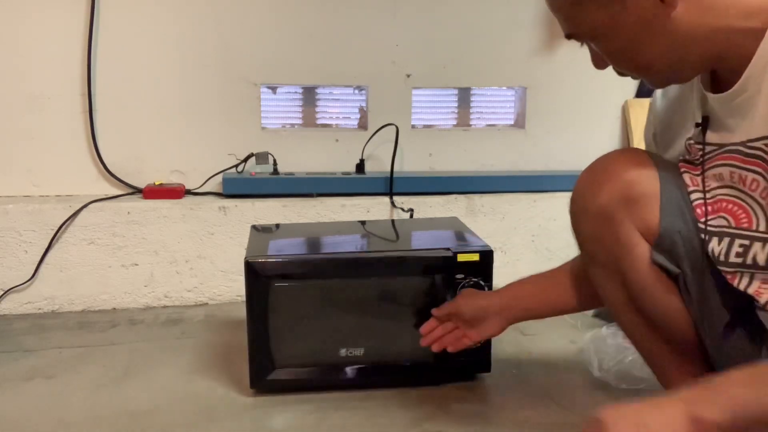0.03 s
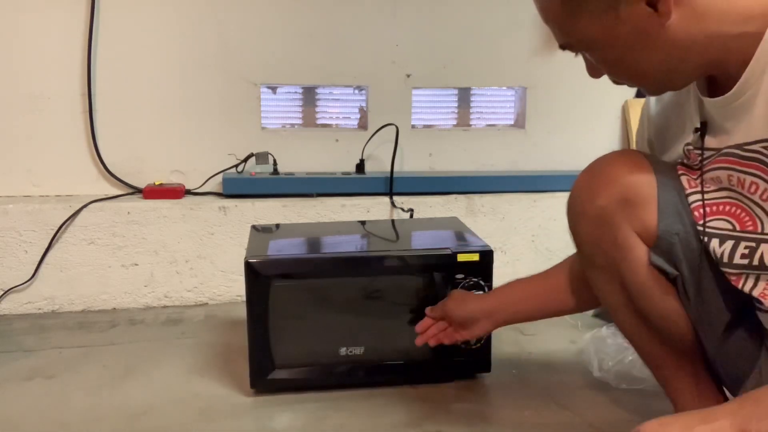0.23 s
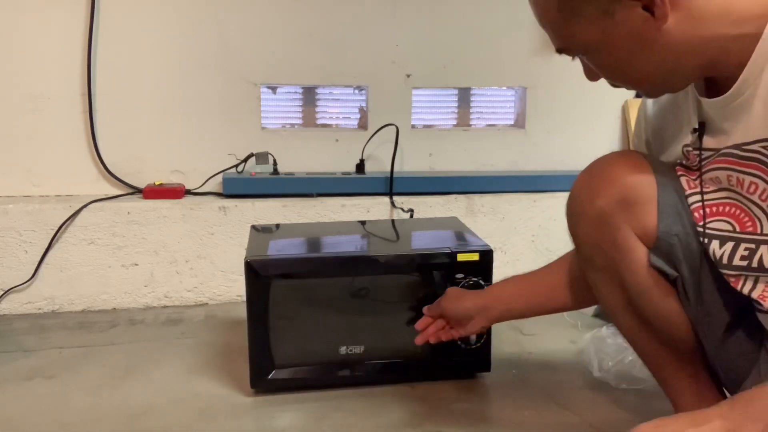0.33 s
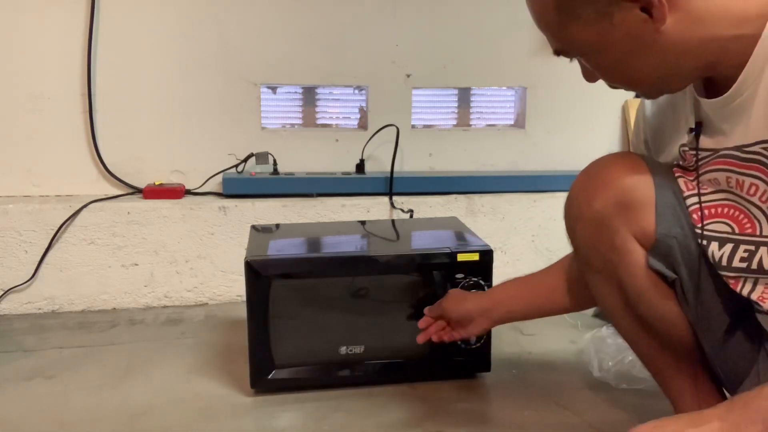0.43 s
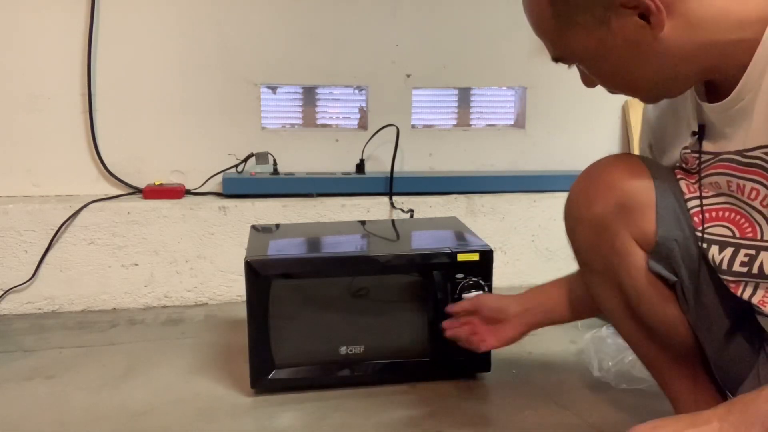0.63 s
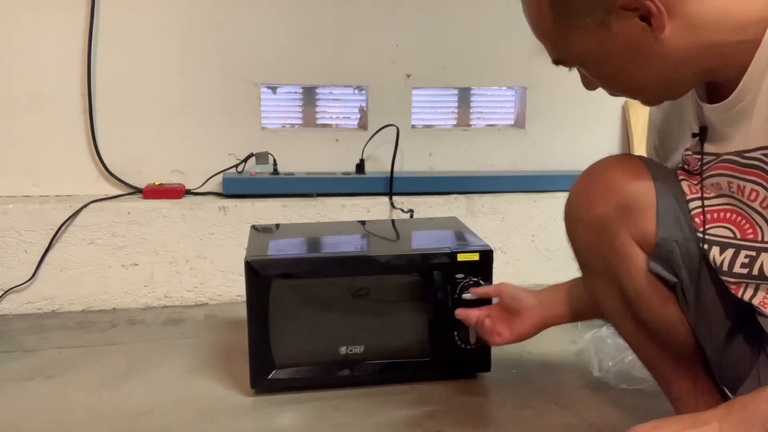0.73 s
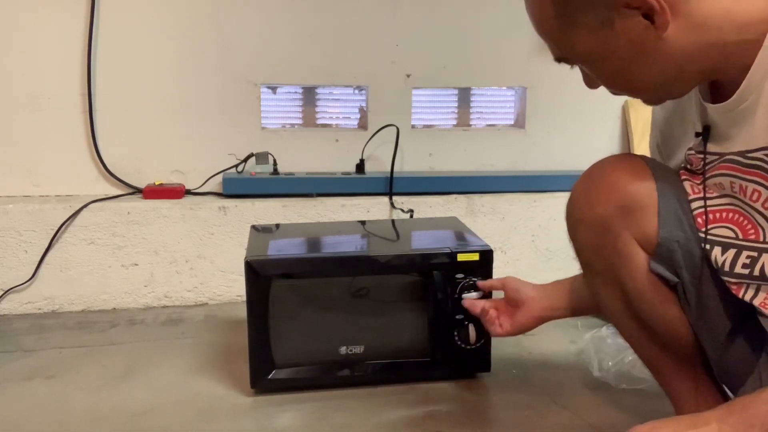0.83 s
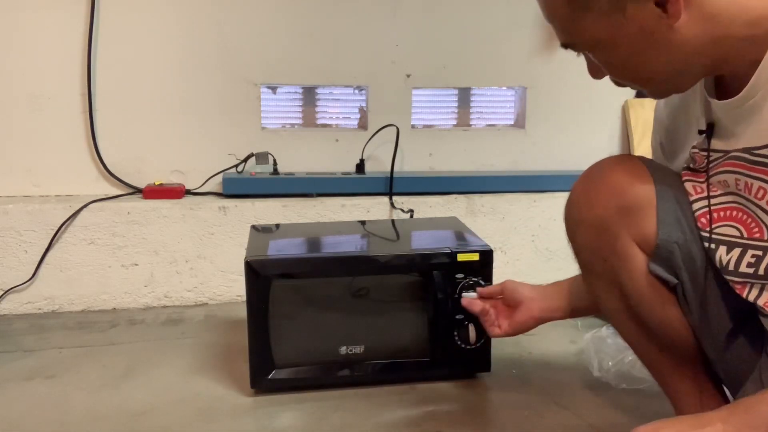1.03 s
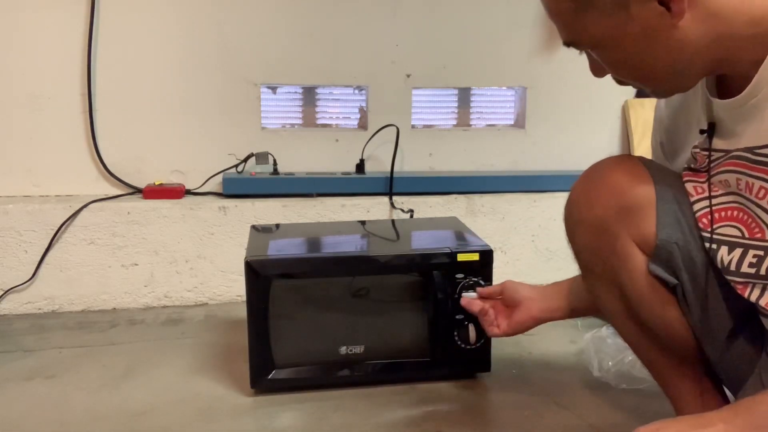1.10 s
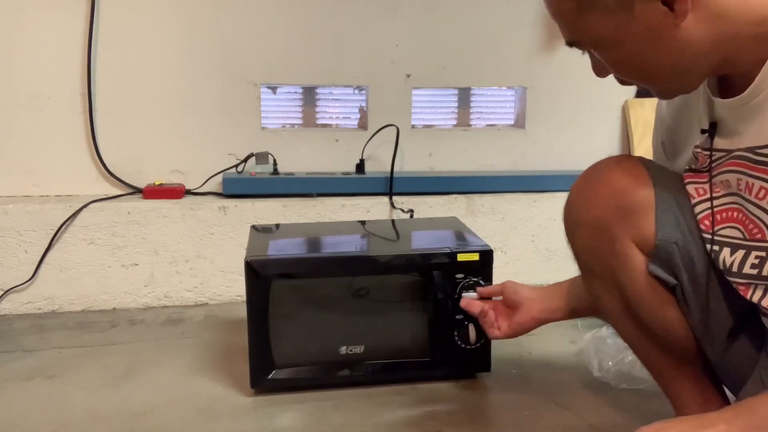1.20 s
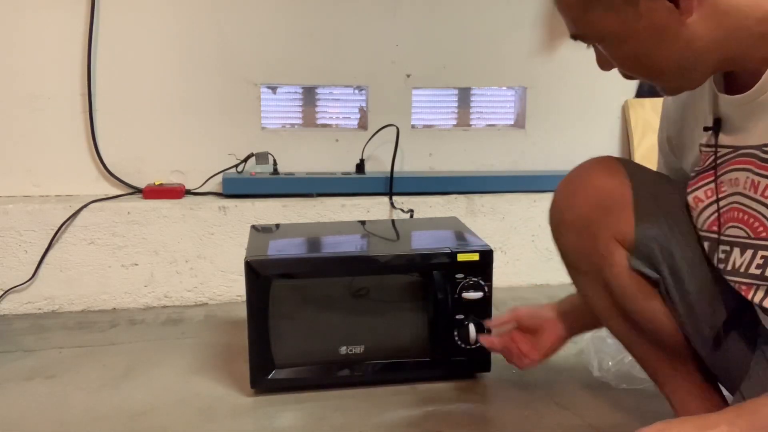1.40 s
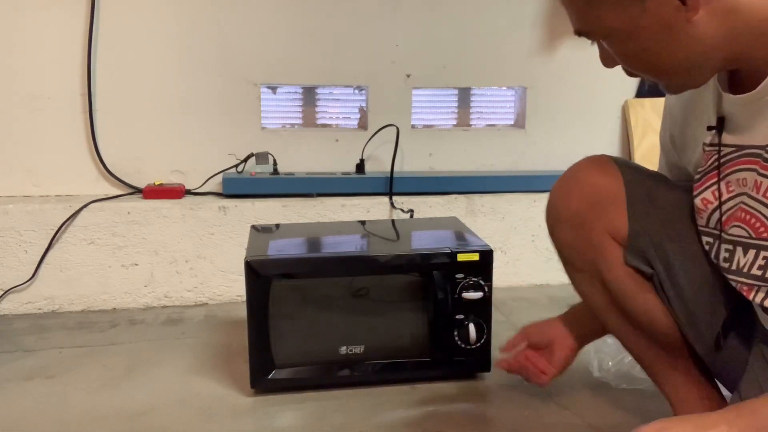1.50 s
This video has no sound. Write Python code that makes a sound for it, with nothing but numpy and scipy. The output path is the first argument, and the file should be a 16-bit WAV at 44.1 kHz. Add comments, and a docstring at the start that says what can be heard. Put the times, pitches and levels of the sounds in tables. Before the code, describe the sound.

The loud slam of a microwave door overloads a close microphone in a quiet room. As the metal case rings away, a plastic knob is softly knocked and turned, giving a dull rub and a few small, sharp ticks.

```python
"""A quiet, hard-walled room: the door of a small microwave oven is slammed, overloading a close mic.
An earlier bump is dying away at the start. Air puffs ahead of the door, the latch brushes its catch,
the door hits and rebounds, and the steel case booms and hums on for a second. Afterwards a hand
knocks on the plastic timer knob and turns it, with a dull rub and a few sharp ticks."""
import sys
import numpy as np
from scipy import signal
from scipy.fft import rfft, irfft
from scipy.io import wavfile
from scipy.ndimage import uniform_filter1d

SR = 44100
rng = np.random.default_rng(int(sys.argv[2]) if len(sys.argv) > 2 else 0)


def log_audio(samples):
    """Write samples as a 16-bit WAV file to the path given in sys.argv[1]."""
    # one column per channel
    frames = np.atleast_2d(samples).T
    # limit to full scale, then quantise
    limited = np.clip(frames, -1, 1)
    pcm = np.round(limited * 32767).astype(np.int16)
    wavfile.write(sys.argv[1], SR, pcm)


N = 68355
T = np.arange(N) / SR
HZ = np.fft.rfftfreq(N, 1 / SR)
SLAM_S = 0.2432

# what a blow on the door radiates at once (frequency [Hz], relative level [dB])
CRACK_SPECTRUM = [(30, -18.5), (55, -18), (100, -5), (220, -3.5), (340, 3.5), (480, -5), (800, -7),
                  (1250, -5), (2000, -17.5), (4000, -20.5), (7500, -22.5), (11000, -32), (15000, -42)]
# reverb time of the room (frequency [Hz], t60 [s])
ROOM_DECAY = [(60, 0.71), (250, 0.48), (700, 0.45), (1500, 0.38), (4000, 0.43), (8000, 0.37), (15000, .28)]


def amp(db):
    """Decibels to gain."""
    return 10 ** (np.asarray(db) / 20)


def unit_rms(x):
    """Scales to an rms of one."""
    return x / np.sqrt(np.mean(x ** 2) + 1e-20)


def curve_at(points, hz):
    """Reads a breakpoint curve on a log-frequency axis."""
    freqs, values = np.transpose(points)
    return np.interp(np.log(hz + 1), np.log(freqs + 1), values)


def fade(t, t60):
    """Exponential decay, 60 dB down after t60 seconds."""
    return np.exp(-np.log(1000) * t / t60)


def add(mix, start_s, sound):
    """Drops a sound into the mix at its start time."""
    part = mix[round(start_s * SR):][:len(sound)]
    part += sound[:len(part)]


def noise(spectrum, tilt_db=0):
    """Unit-rms noise of a given colour, tilted by tilt_db per octave."""
    gain = amp(curve_at(spectrum, HZ) + tilt_db * np.log2(HZ + 1))
    return unit_rms(irfft(rfft(rng.standard_normal(N)) * gain, N))


def noise_tail(spectrum, decay, tilt_db=0):
    """Coloured noise in which each band dies away at its own rate."""
    hz, t, bands = signal.stft(noise(spectrum, tilt_db), SR, nperseg=512)
    bands = bands * fade(t, curve_at(decay, hz)[:, None])
    return signal.istft(bands, SR, nperseg=512)[1][:N]


def room_tone():
    """A low bed of room noise whose level wavers a little."""
    # colour of the quiet room (frequency [Hz], relative level [dB])
    air_spectrum = [(20, 0), (55, -1), (110, -9), (260, -9), (600, -15), (1000, -21), (1350, -18),
                    (2000, -30), (6500, -31), (10000, -37), (15000, -47)]
    rates_hz = np.geomspace(1, 20, 20)
    swell = sum(np.sin(2 * np.pi * (hz * T + rng.random())) / np.sqrt(hz) for hz in rates_hz)
    return amp(-48.5 + 1.35 * unit_rms(swell)) * noise(air_spectrum)


def bump():
    """The tail of an earlier bump and scuff dies away."""
    # colour of the bump (frequency [Hz], relative level [dB])
    bump_spectrum = [(40, -9.5), (200, 1.5), (400, -13), (800, -5), (1600, -19), (5000, -24.5),
                     (11500, -30.5), (14000, -44)]
    # how long its bands ring (frequency [Hz], t60 [s])
    bump_decay = [(200, 0.71), (800, 0.42), (3000, 0.73), (8000, 1.35)]
    return amp(-31) * noise_tail(bump_spectrum, bump_decay)


def air_puff():
    """Air pushed ahead of the closing door: a dull puff that peaks at the hit."""
    envelope = np.exp(-abs(SLAM_S - T) / 0.0068)
    return amp(-21.5) * noise(CRACK_SPECTRUM, tilt_db=-2.5) * envelope


def door_blows():
    """Each blow gives a short crack and a clatter that lingers in the room."""
    # first contact, the hit, the latch snapping in, the rebound (time [s], level [dB])
    blows = [(.2410, -29), (0.2431, 1), (0.248, -1), (0.257, -7)]
    # dense ringing of panels and loose parts (frequency [Hz], relative level [dB])
    clatter_spectrum = [(30, -2.5), (100, -5.5), (200, 2), (420, -1.5), (620, 2), (900, -3.5), (1300, -4),
                        (1900, -9.5), (3000, -10.5), (4300, -16), (7000, -16), (10000, -25.5), (15000, -40)]
    crack_attack = 1 - np.exp(-T / 0.00061)
    clatter_attack = 1 - np.exp(-T / 0.004)
    out = np.zeros(N)
    for start_s, db in blows:
        crack = amp(0.5) * noise(CRACK_SPECTRUM) * fade(T, t60=0.062) * crack_attack
        clatter = amp(-12) * noise_tail(clatter_spectrum, ROOM_DECAY) * clatter_attack
        add(out, start_s, amp(db) * (crack + clatter))
    return out


def door_resonances(x):
    """Many small, overlapping resonances of the door colour a sound like an uneven EQ."""
    spacing_hz, depth_db = 140, 3
    grid_hz = np.arange(0, SR / 2, spacing_hz)
    heights = rng.standard_normal(2000)[:len(grid_hz)]
    ripple_db = depth_db * np.interp(HZ, grid_hz, heights)
    gain = amp(ripple_db * np.minimum(HZ / 1000, 1))  # flatter towards the bass
    return irfft(rfft(x) * unit_rms(gain), N)


def door_thump():
    """The door's landing pushes a pulse of air through the room: a deep thump."""
    out = np.zeros(N)
    add(out, SLAM_S, amp(4.5) * np.sin(2 * np.pi * 122.5 * T) * fade(T, t60=0.047))
    return out


def case_boom():
    """The hit sets the steel panels booming; a few modes hum on. Little remains below about 45 Hz."""
    # modes of the steel case (frequency [Hz], level [dB], t60 [s])
    case_modes = [(67, -9, 0.11), (125.1, -13, 0.13), (165.6, -29.5, 2.72), (160.5, -23, 0.76),
                  (187.9, -21, 0.97), (193.6, -9, 0.3), (253, -15, .36), (249, -41, 2.8), (342, -38, 1.51),
                  (321, -8.5, .17), (349.6, -4.5, .2), (419.6, -33.5, .9), (489.3, -13, 0.28),
                  (550, -10, 0.26), (701, -25.5, 0.79), (794, -12.5, 0.15), (878, -17.5, 0.16),
                  (889.4, -18.5, 0.26), (1024, -25, .26), (1154, -7.5, 0.14), (1410, -40.5, 1.16),
                  (1467, -13.5, .23), (1550, -57.5, 0.4), (1995, -27, 0.31), (2700, -24, 0.17),
                  (2928, -14.5, 0.12), (3044, -24.5, 0.37)]
    ring = sum(amp(db) * fade(T, t60) * np.sin(2 * np.pi * hz * T) for hz, db, t60 in case_modes)
    attack = 1 - np.exp(-T / 0.0076)
    out = np.zeros(N)
    add(out, SLAM_S, ring * attack)
    return signal.sosfilt(signal.butter(2, 45, "high", fs=SR, output="sos"), out)


def knob_knocks():
    """Fingers knock softly on the plastic knob: a noisy tap, a hollow tone and a room tail."""
    # finger knocks (time [s], level [dB], tap t60 [s], brightness [dB/octave], hollow tone [Hz])
    knocks = [(.7365, -58, .02, 12, 643), (.803, -55, 0.11, 2, 640), (0.8707, -37, 0.11, -2, 690),
              (.9130, -37.5, 0.014, 2.5, 608), (.932, -42.5, 0.2, -3, 540), (1.2280, -30.5, 0.017, 0, 544),
              (1.484, -56, 0.0083, 5, 600)]
    # colour of a finger on plastic (frequency [Hz], relative level [dB])
    knock_spectrum = [(80, -12), (300, -24), (500, -3.5), (680, -3.5), (1000, -16.5), (1700, -21),
                      (4000, -9.5), (9000, -23), (14000, -41)]
    out = np.zeros(N)
    for start_s, db, t60, tilt_db, hz in knocks:
        hollow = amp(-8) * np.sin(2 * np.pi * hz * T) * fade(T, t60=0.061)
        tail = noise_tail(knock_spectrum, ROOM_DECAY, tilt_db) * np.sqrt(t60)  # longer tap, louder tail
        tap = noise(knock_spectrum, tilt_db) * fade(T, t60)
        add(out, start_s, amp(db) * (tap + hollow + tail))
    return out


def knob_rub():
    """The knob's shaft rubs as it turns: dull, uneven friction."""
    # colour of the rubbing shaft (frequency [Hz], relative level [dB])
    rub_spectrum = [(100, -17), (250, 4), (550, -4.5), (1000, -16), (1350, 1), (1700, -7.5)]
    start_s, end_s, ramp_s = 0.86, 1.41, 0.01
    turning = np.clip(np.minimum(T - start_s, end_s - T) / ramp_s, 0, 1)
    roughness_db = 2.5 * unit_rms(uniform_filter1d(rng.standard_normal(N), size=200))
    friction = noise(rub_spectrum) * amp(roughness_db)
    dull = signal.sosfilt(signal.butter(4, 2500, fs=SR, output="sos"), friction)
    return amp(-54.5) * turning * unit_rms(dull)


def knob_ticks():
    """The turning knob ticks: tiny, gritty pings with a faint room tail."""
    # ticks of the knob (time [s], level [dB], pitch [Hz], t60 [s])
    ticks = [(1.1462, -30, 6600, .003), (1.1481, -23, 6300, .004), (1.1488, -27, 3300, .008),
             (1.1653, -32, 4300, .003), (1.1750, -38, 4100, .004), (1.2282, -30, 3850, .012)]
    # colour of their grit and tail (frequency [Hz], relative level [dB])
    tick_spectrum = [(500, -33), (3000, -12), (7500, -13), (9500, -12), (15000, -34)]
    out = np.zeros(N)
    for start_s, db, hz, t60 in ticks:
        grit = 0.2 * noise(tick_spectrum)
        ping = (np.sin(2 * np.pi * hz * T) + grit) * fade(T, t60)
        tail = amp(-34) * noise_tail(tick_spectrum, ROOM_DECAY)
        add(out, start_s, amp(db) * (ping + tail))
    return out


def scene():
    """The slam, the bump, the knob and the room tone, mixed in mono."""
    slam = air_puff() + door_resonances(door_blows()) + door_thump() + case_boom()
    return (slam + bump() + knob_knocks() + knob_ticks() + knob_rub() + room_tone())[None]


def record(dry):
    """The slam overloads the input and soft-clips at full scale; a steep low-pass trims the top."""
    drive_db, knee, cutoff_hz = 0.5, 6, 15800
    driven = dry * amp(drive_db)
    clipped = driven / (1 + abs(driven) ** knee) ** (1 / knee)
    lowpass = signal.firwin(511, cutoff_hz, window=("kaiser", 9), fs=SR)
    return signal.oaconvolve(clipped, lowpass[None], "same")


dry = scene()
out = record(dry)
log_audio(out)
```